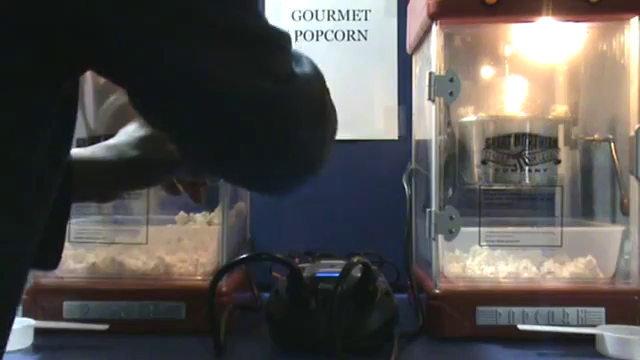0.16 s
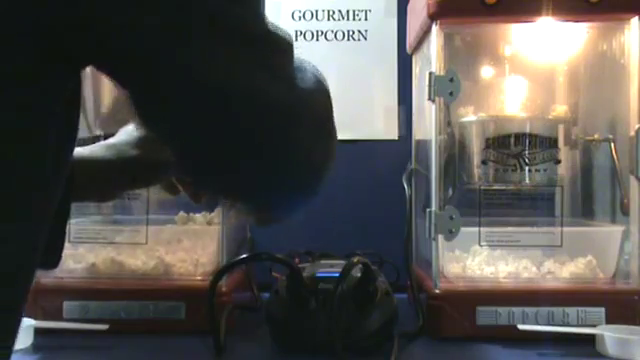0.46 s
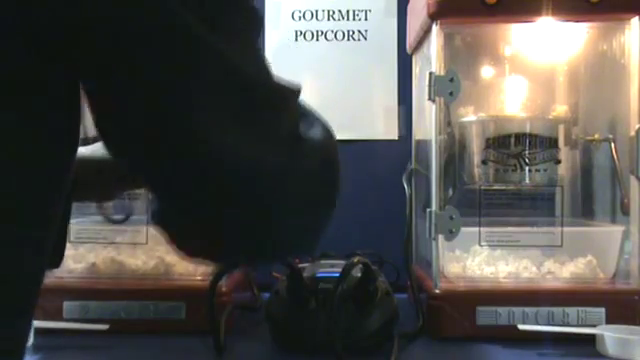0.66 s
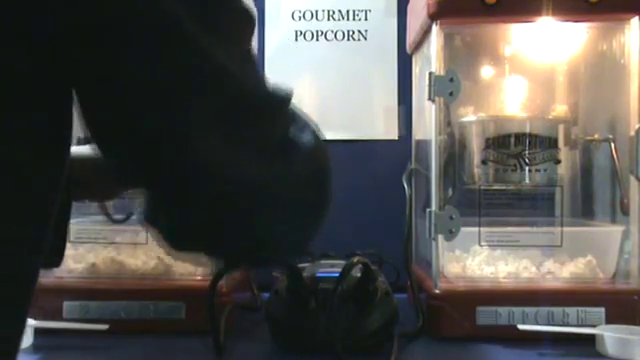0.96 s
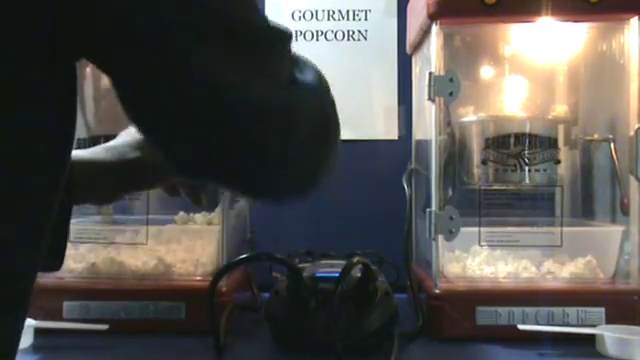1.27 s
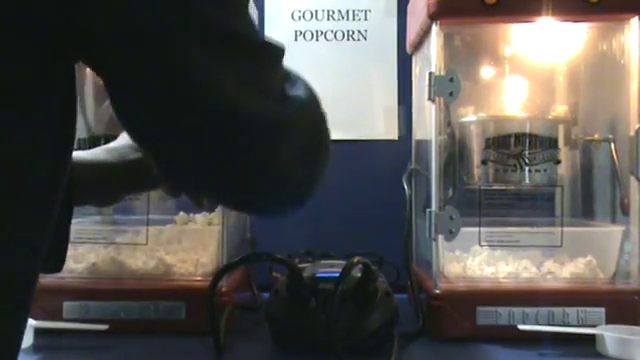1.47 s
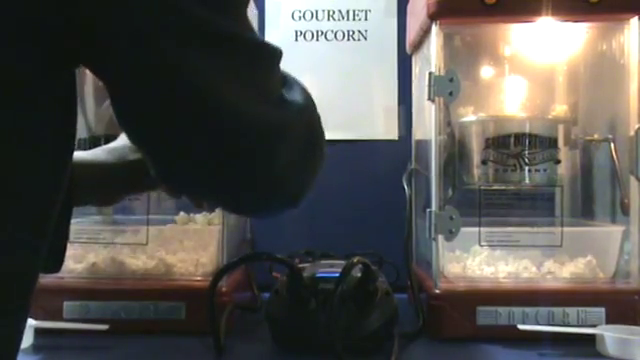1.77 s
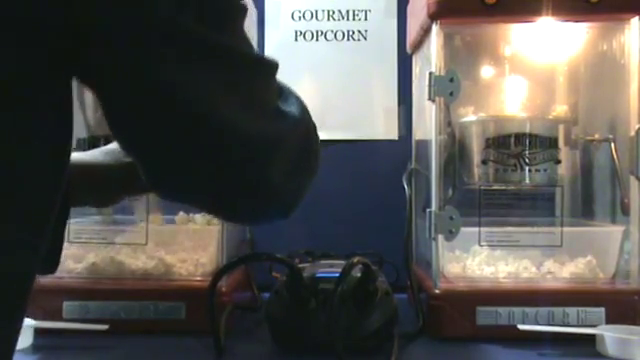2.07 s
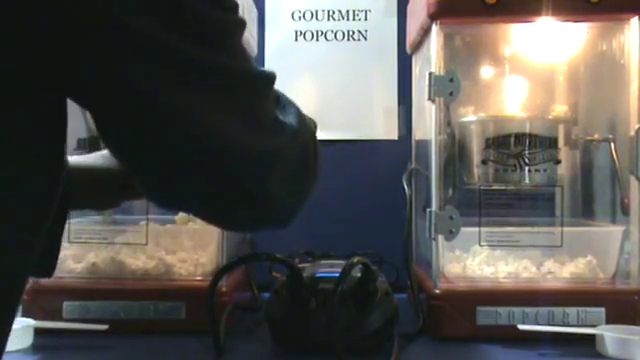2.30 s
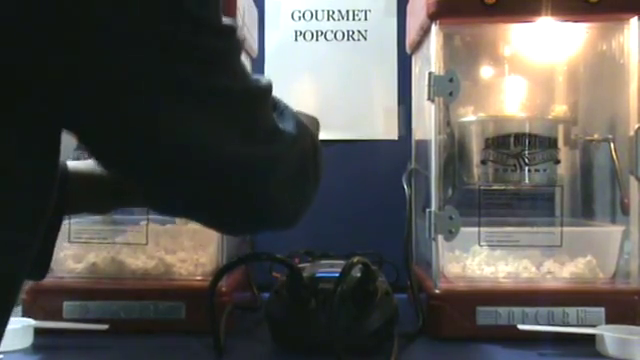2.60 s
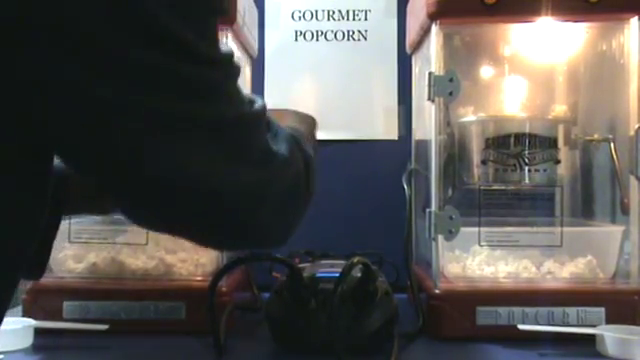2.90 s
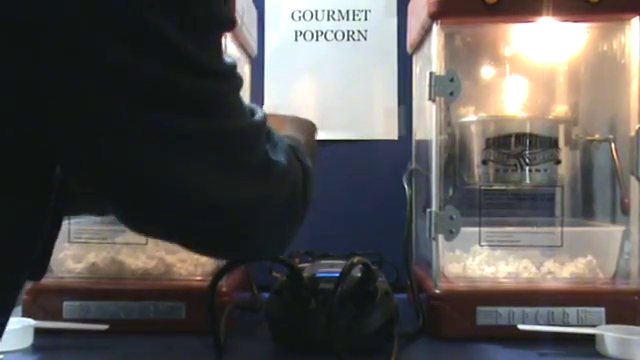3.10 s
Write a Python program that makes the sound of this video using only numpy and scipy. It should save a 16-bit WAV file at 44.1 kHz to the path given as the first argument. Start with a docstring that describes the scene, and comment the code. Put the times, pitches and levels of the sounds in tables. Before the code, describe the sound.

Popcorn being scooped with a hollow metal scoop, crunching, pattering out, and rattling in a small room

```python
"""A metal scoop digs into popped corn and tips out a load, in a small workshop.
Each stroke is a burst of grains that crunches the heap against the hollow scoop and rings its body modes;
a moment later loose kernels skid over the thin wall, a finer hiss of grains that makes its high modes sing.
One load tumbles out in pattering clumps, with a band of noise sinking in pitch as its hollow note.
The scoop knocks as noise bursts, rings as decaying sines and rumbles as low grains while it is handled."""
import sys
import numpy as np
from scipy import signal
from scipy.fft import rfft, irfft
from scipy.io import wavfile

SR = 44100
rng = np.random.default_rng(int(sys.argv[2]) if len(sys.argv) > 2 else 0)


def pcm_store(signal):
    """Save signal as 16-bit PCM."""
    levels = np.round(np.clip(np.atleast_2d(signal), -1, 1) * 32767)
    wavfile.write(sys.argv[1], SR, levels.astype(np.int16).T)


N = 143325  # length in samples
T = np.arange(N) / SR  # time axis, s
HZ = np.fft.rfftfreq(2 * N, 1 / SR)  # frequency axis of the zero-padded scene


def amp(db):
    """Decibels to gain."""
    return 10 ** (np.asarray(db) / 20)


def unit(x):
    """Scales a signal or response to energy 1."""
    return x / np.sqrt(np.sum(x ** 2) + 1e-20)


def read(points, hz):
    """Reads a table on a log-frequency axis."""
    f, value = np.transpose(points)
    return np.interp(np.log(hz + 1), np.log(f + 1), value)


def through(x, response):
    """Plays x through an impulse response."""
    return signal.fftconvolve(x, response)[:N]


def colour(x, points, size=4096):
    """Causal (minimum-phase) filter of energy 1 with the given spectrum."""
    hz = abs(np.fft.fftfreq(size, 1 / SR))
    log_gain = np.log(amp(read(points, hz)))
    spectrum = np.exp(np.conj(signal.hilbert(log_gain)))
    response = np.fft.ifft(spectrum).real[:size // 2]
    return through(x, unit(response))


def decay(t, t60):
    """Exponential die-away that loses 60 dB in t60 seconds."""
    return np.exp(-np.log(1000) * t / t60)


def ring(x, modes):
    """Rings a set of damped modes, together of energy 1."""
    t = T[:SR // 2]
    waves = [amp(db) * unit(decay(t, t60) * np.sin(2 * np.pi * hz * t)) for hz, db, t60 in modes]
    return through(x, unit(sum(waves)))


def grains(per_s, spread_db):
    """Random tiny impacts of uneven size, mean power 1."""
    size = amp(spread_db * np.minimum(rng.exponential(1, N), 4))
    sign = rng.choice([-1, 1], N)
    struck = rng.random(N) < per_s / SR
    return np.sqrt(N) * unit(size * sign * struck)


def surges(rows, fall_db_per_s):
    """Joint envelope of (start, rise, hold, level) surges that die away at one speed; powers add."""
    power = np.zeros(N)
    for s, rise, hold, db in rows:
        attack = np.clip((T - s) / max(rise, 1 / SR), 0, 1)
        fall_db = fall_db_per_s * np.maximum(T - s - rise - hold, 0)
        power += (attack * amp(db - fall_db)) ** 2
    return np.sqrt(power)


# how hard the scoop is handled: t/s, level/dB
HANDLING_LEVEL = [(0, -33), (.1, -28), (.19, -28.5), (.33, -30.5), (.44, -40), (.52, -32.5), (.65, -55),
                  (.8, -32.5), (.97, -38.5), (1.22, -44.5), (1.33, -34), (1.38, -26.5), (1.56, -26.5),
                  (1.68, -33.5), (1.79, -32.5), (1.85, -26.5), (1.97, -28), (2.08, -25), (2.17, -34),
                  (2.26, -30), (2.39, -35.5), (2.5, -24), (2.7, -30), (2.86, -26.5), (3.08, -30.5),
                  (3.25, -34.5)]
# tone of the rumble: f/Hz, level/dB
RUMBLE_COLOUR = [(20, -28), (45, -26), (66, -7), (85, -9), (120, -4), (170, -2), (215, -4), (290, -0.5),
                 (420, -4.5), (550, -9.5), (750, -8.5), (1500, -18), (4000, -28.5), (15000, -40)]
RUMBLE_PER_S = 1400


def handling():
    """Low rumble of the scoop and the shifting heap: grains filtered down to the lows."""
    level = amp(np.interp(T, *np.transpose(HANDLING_LEVEL)))
    return colour(level * grains(RUMBLE_PER_S, spread_db=1.7), RUMBLE_COLOUR)


# steady background air: f/Hz, level/dB
AIR_COLOUR = [(20, -11), (60, -20), (300, -19.5), (1300, -13.5), (3800, -20.5), (8000, -27), (15000, -50)]
AIR_DB = -50.5


def air():
    """Faint steady background of filtered noise."""
    return amp(AIR_DB) * colour(rng.standard_normal(N), AIR_COLOUR)


# strokes of the scoop: t/s, crunch rise/s, hold of crunch and skid/s,
# crunch level/dB, skid level/dB, lag of the skid/s
SCOOP_STROKES = [(0.1, .024, .004, -22, -32.5, 0.013), (0.142, 0.022, 0.047, -17.5, -17, 0.021),
                 (0.526, 0.0025, .01, -31, -30, 0.0027), (0.546, 0.016, 0.022, -34, -32, .003),
                 (1.144, 0.016, .01, -40.5, -44, 0.0026), (1.348, 0.0028, 0.01, -12, -21, 0.0014),
                 (1.377, 0.011, 0.036, -18, -16.5, 0.012), (1.439, 0.024, 0.026, -24.5, -24, 0.0069),
                 (1.52, 0.02, 0.031, -21.5, -21.5, 0.011), (1.596, 0.024, 0.017, -30.5, -25, 0.0046),
                 (1.673, 0.0061, 0.073, -29, -35, 0.021), (1.797, 0.022, 0.059, -22, -21.5, 0.034),
                 (1.896, 0.038, 0.065, -34, -25.5, 0.0041), (1.986, 0.022, 0.025, -28.5, -24.5, .003),
                 (2.086, 0.005, 0.0079, -22, -33, 0.0039), (2.137, 0.025, 0.035, -34, -22.5, 0.0056),
                 (2.234, .02, 0.14, -38.5, -50.5, .003), (2.416, 0.011, 0.029, -37.5, -57, .01),
                 (2.498, 0.0078, 0.068, -26.5, -35.5, .003), (2.539, 0.01, 0.079, -25.5, -28.5, 0.0092),
                 (2.658, 0.022, 0.077, -27.5, -26.5, 0.028), (2.796, 0.0061, 0.0064, -24, -28, .005),
                 (2.832, 0.011, 0.044, -24.5, -23, 0.023), (2.895, 0.037, 0.068, -29.5, -24, .005),
                 (2.967, 0.014, 0.047, -21.5, -22.5, 0.016), (3.049, 0.02, 0.013, -32.5, -24.5, .01),
                 (3.124, 0.018, 0.04, -35.5, -48, .003)]
# tone of the crushed heap: f/Hz, level/dB
CRUNCH_COLOUR = [(40, -25), (130, 2), (350, 0.5), (550, -8), (750, 6), (1150, -8.5), (1900, -0.5),
                 (2450, -11.5), (3300, -4), (4600, -15.5), (7500, -10.5), (15000, -34.5)]
# hollow modes of the scoop: f/Hz, level/dB, t60/s
BODY_MODES = [(170.7, -13.5, .2), (291.5, -3.5, 0.42), (443.4, -5, 0.25), (707.2, 1.5, 0.18),
              (721, -7.5, 0.13), (846.5, -10.5, 0.18), (1036, -11, 0.28), (1122, -7, 0.28),
              (1358, -8.5, 0.041), (1832, -8.5, 0.048), (2133, -9, 0.13), (3180, -5.5, 0.063),
              (3718, -5.5, 0.04)]
CRUNCH_PER_S, CRUNCH_FALL_DB_PER_S = 1500, 236
CRUNCH_DRY_DB, BODY_DB = -2.5, -3


def crunch():
    """The heap is crushed against the scoop: (dry crunch, ring of its hollow modes)."""
    push = surges([row[:4] for row in SCOOP_STROKES], CRUNCH_FALL_DB_PER_S)
    hits = push * grains(CRUNCH_PER_S, spread_db=3.0)
    dry_crunch = amp(CRUNCH_DRY_DB) * colour(hits, CRUNCH_COLOUR)
    return dry_crunch + ticks(push), amp(BODY_DB) * ring(hits, BODY_MODES)


TICKS_PER_S, TICK_DB = 200, -7
TICK_LOW_HZ, TICK_HIGH_HZ = 1102, 5260  # pitches stray up to 4 % around this spread
TICK_CYCLES = 12.6  # cycles for a click to fall to 1/e


def ticks(push, count=24):
    """Single hard kernels click with brief damped sines, drawn from a spread of pitches."""
    t = T[:2048]
    out = np.zeros(N)
    for hz in np.geomspace(TICK_LOW_HZ, TICK_HIGH_HZ, count) * rng.uniform(.96, 1.04, count):
        click = unit(np.exp(-t * hz / TICK_CYCLES) * np.sin(2 * np.pi * hz * t))
        out += through(push * grains(TICKS_PER_S / count, spread_db=0.0), click)
    return amp(TICK_DB) * out / np.sqrt(count)


# tone of the skidding kernels: f/Hz, level/dB
SKID_COLOUR = [(100, -23), (800, -8.5), (2400, -4), (3400, 0), (4700, -1.5), (6500, 0), (7600, -0.5),
               (7950, -5.5), (8450, 4.5), (9300, -3.5), (12500, -7), (15500, -12.5)]
# high modes of the thin wall: f/Hz, level/dB, t60/s
WALL_MODES = [(3718, -3.5, 0.28), (6720, -9, .22), (7040, -13, 0.18), (7690, 1, 0.11), (8800, -15, .06),
              (8376, 6, .13), (8690, 7.5, 0.21), (9650, -6, .3), (9835, 4, 0.2), (11120, -1, 0.24),
              (11680, -10, 0.2), (11700, -9, 0.29), (12400, -11, 0.19), (12800, -12.5, 0.17),
              (13038, -3, .25)]
SKID_PER_S, SKID_RISE_S, SKID_FALL_DB_PER_S = 2800, 0.016, 190
SKID_DRY_DB, WALL_DB = -1, -4.5


def skid():
    """Loose kernels skid over the wall just after each stroke: (dry hiss, ring of the wall)."""
    slides = [(s + lag, SKID_RISE_S, hold, db) for s, _, hold, _, db, lag in SCOOP_STROKES]
    flow = surges(slides, SKID_FALL_DB_PER_S)
    hits = flow * grains(SKID_PER_S, spread_db=1.0)
    return amp(SKID_DRY_DB) * colour(hits, SKID_COLOUR), amp(WALL_DB) * ring(hits, WALL_MODES)


# clumps that tumble out: t/s, rise/s, hold/s, level/dB
POURED_CLUMPS = [(.595, 0.014, 0.011, -12.5), (.63, 0.012, .025, -16), (.684, 0.0056, 0.016, -14),
                 (.725, 0.028, 0.044, -22), (.85, .01, 0.018, -37)]
# tone of the tumbling corn: f/Hz, level/dB
TUMBLE_COLOUR = [(50, -27), (110, -18), (160, -8), (330, -10), (450, -4.5), (540, -2.5), (950, 0.5),
                 (1200, -8.5), (1900, -3), (2500, -7.5), (3400, -4), (5000, -9), (7000, -6), (8400, -8.5),
                 (9500, -13), (12500, -15.5), (15500, -25)]
# sinking hollow note: t/s, f/Hz, level/dB
HOLLOW_NOTE = [(.67, 901, -45), (.69, 837, -18.5), (.73, 783, -32), (0.788, 745, -27.5), (0.831, 589, -43),
               (0.861, 405.7, -29), (.9, 313, -34), (.94, 297, -60)]
TUMBLE_PER_S, TUMBLE_FALL_DB_PER_S = 3200, 241
HOLLOW_WIDTH_HZ = 150  # bandwidth of each of two equal poles


def pour():
    """Clumps tumble out as grains, and a hollow resonance (narrow noise) sinks as they go."""
    flow = surges(POURED_CLUMPS, TUMBLE_FALL_DB_PER_S)
    patter = colour(flow * grains(TUMBLE_PER_S, spread_db=1.5), TUMBLE_COLOUR)
    s, hz, db = np.transpose(HOLLOW_NOTE)
    r = np.exp(-np.pi * HOLLOW_WIDTH_HZ / SR)
    noise = rng.standard_normal(N) + 1j * rng.standard_normal(N)
    flutter = signal.lfilter([1], [1, -2 * r, r * r], noise)
    # shift the slow flutter up to the gliding pitch
    carrier = np.exp(2j * np.pi * np.cumsum(np.interp(T, s, hz)) / SR)
    note = np.sqrt(N) * unit((flutter * carrier).real)
    return patter + note * np.interp(T, s, amp(db), left=0, right=0)


# knocks of the scoop: t/s, thump level/dB, clack level/dB
SCOOP_KNOCKS = [(0.6, -13, -17.5), (0.632, -17.5, -39), (0.844, -20, -26.5), (1.003, -25, -32.5),
                (1.011, -31, -30.5), (1.036, -27.5, -37), (1.247, -30.5, -45.5), (1.35, -18.5, -20.5),
                (1.397, -19, -43), (2.088, -21.5, -31), (2.811, -22, -33)]
# tone of the dull thump: f/Hz, level/dB
THUMP_COLOUR = [(40, -35), (110, -16.5), (160, -2.5), (210, -5.5), (275, 1), (330, -3.5), (450, -2),
                (700, -10.5), (1500, -13), (6000, -83)]
# tone of the dry rattle: f/Hz, level/dB
CLACK_COLOUR = [(100, -12), (600, -2), (1800, 4), (3000, 1), (6500, -2), (10000, -9.5), (15000, -12)]
KNOCK_FALL_DB_PER_S = 590


def knocks():
    """Each knock is a dull thump with a short dry rattle, both fast-dying bursts of grains."""
    thumps = surges([(s, .003, .004, db) for s, db, _ in SCOOP_KNOCKS], KNOCK_FALL_DB_PER_S)
    clacks = surges([(s, .002, .006, db) for s, _, db in SCOOP_KNOCKS], KNOCK_FALL_DB_PER_S)
    thump = colour(thumps * grains(4000, spread_db=2.0), THUMP_COLOUR)
    clack = colour(clacks * grains(2500, spread_db=2.5), CLACK_COLOUR)
    return thump + clack


# blows that ring one patch of the scoop: t/s, f/Hz, level/dB, t60/s
RINGING_BLOWS = [(.604, 272.6, -18.5, 0.48), (.608, 6540, -18, 0.099), (.69, 8376, -16.5, 0.32),
                 (.876, 289, -17.5, 0.17), (1.005, 170, -31, 0.29), (1.033, 310, -18, 0.18),
                 (1.262, 275, -28, 0.25), (1.35, 721, -9, 0.24), (1.36, 1334, -11, 0.075),
                 (1.556, 704, -26, 0.21), (1.815, 697, -17.5, 0.12), (2.158, 1860, -15, 0.066),
                 (2.808, 3230, -19, 0.083), (2.847, 718, -18, 0.1)]
DING_RISE_S = 0.0034


def dings():
    """Hard blows make one patch of the scoop ring out above the rest, each a decaying sine."""
    out = np.zeros(N)
    for s, hz, db, t60 in RINGING_BLOWS:
        t = np.maximum(T - s, 0)
        attack = np.minimum(t / DING_RISE_S, 1)
        out += attack * amp(db) * decay(t, t60) * np.sin(2 * np.pi * hz * t)
    return out


# how long the room rings: f/Hz, t60/s
ROOM_T60 = [(100, 0.21), (500, 0.19), (2000, 0.34), (6000, 0.3), (15000, 0.2)]


def tail(size=256):
    """A diffuse room tail of noise, each band dying at its own speed."""
    hz, t, z = signal.stft(rng.standard_normal(SR // 2), SR, nperseg=size)
    fade = decay(t, read(ROOM_T60, hz)[:, None])
    wave = signal.istft(z * fade, SR, nperseg=size)[1]
    return unit(wave * np.minimum(T[:len(wave)] / 0.0033, 1))  # 3.3 ms build-up


ROOM_TURN_HZ = 1.72


def room(x, count=3):
    """Diffuse reverberation: the feeds of several random tails rotate slowly, which evens out its colour."""
    turn = 2 * np.pi * T * ROOM_TURN_HZ
    out = np.zeros(N)
    for k in range(count):
        feed = x * np.cos(turn + np.pi * k / count)
        out += np.sqrt(2 / count) * through(feed, tail())
    return out


ROOM_DB, ROOM_SIDE_DB = -4, -12
METAL_ROOM_DB, METAL_SIDE_DB = -12, -1.5  # how much of the metal feeds the room, mid and side


def scene():
    """All sources in the small room, heard by a close pair of microphones."""
    corn, metal = np.add(crunch(), skid())
    metal = metal + dings()
    dry = corn + pour() + knocks() + handling() + air()
    mid = dry + metal + amp(ROOM_DB) * room(dry + amp(METAL_ROOM_DB) * metal)
    width = amp(ROOM_SIDE_DB) * room(dry + amp(METAL_SIDE_DB) * metal)
    side = signal.lfilter(*signal.butter(1, 280, "high", fs=SR), width)  # lows stay central
    return np.array([mid + side, mid - side]) / np.hypot(1, amp(ROOM_DB))


# inequality of the microphones: f/Hz, left minus right level/dB
MIC_BALANCE = [(30, -0.5), (250, -1.1), (600, -0.6), (3000, 0), (9000, .5)]
OVERLOAD, EDGE_HZ = .88, 15450  # amplitude ceiling, top of the band


def record(dry):
    """Slightly unequal microphones, soft overload on the loudest peaks, then the band limit."""
    tilt = amp(np.outer([.5, -.5], read(MIC_BALANCE, HZ)))
    tilted = irfft(rfft(dry, 2 * N) * tilt)[:, :N]
    limited = tilted / (1 + (tilted / OVERLOAD) ** 6) ** (1 / 6)
    lowpass = signal.firwin(401, EDGE_HZ, window=("kaiser", 9), fs=SR)
    return signal.oaconvolve(limited, lowpass[None], "same")


dry = scene()
out = record(dry)
pcm_store(out)
```